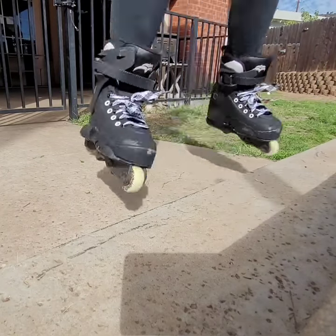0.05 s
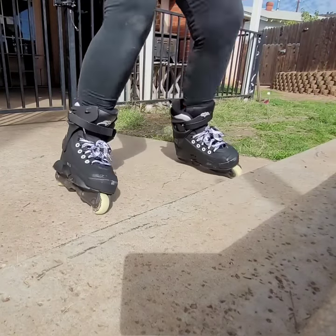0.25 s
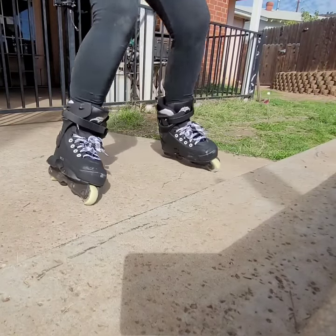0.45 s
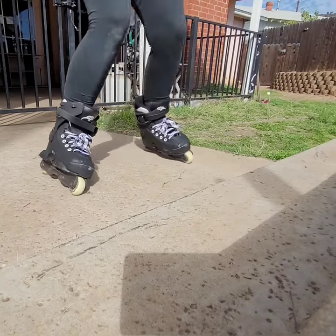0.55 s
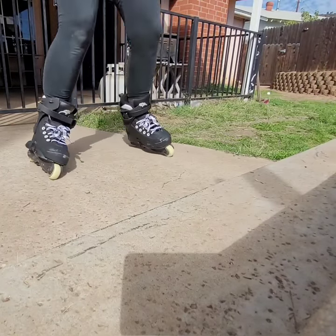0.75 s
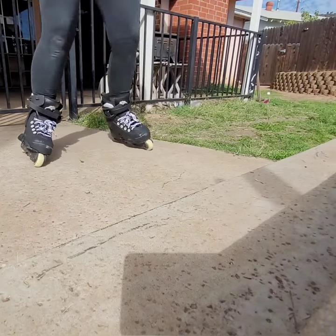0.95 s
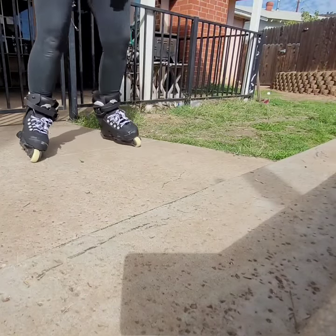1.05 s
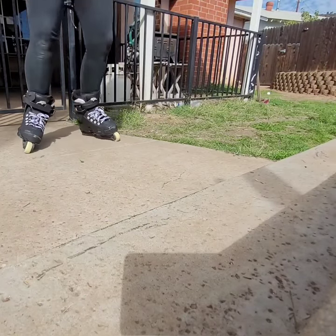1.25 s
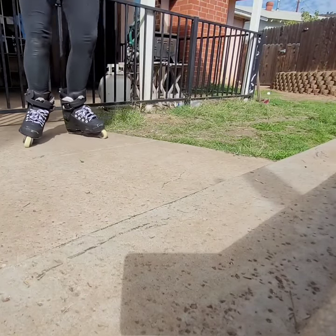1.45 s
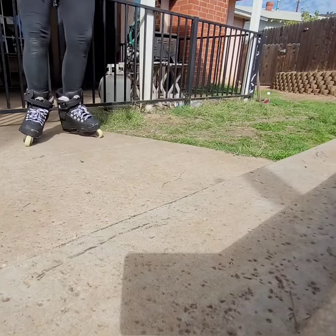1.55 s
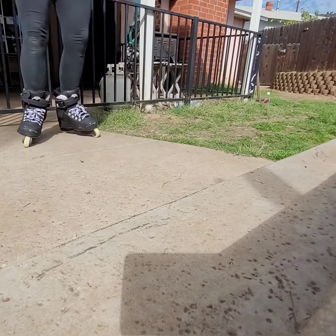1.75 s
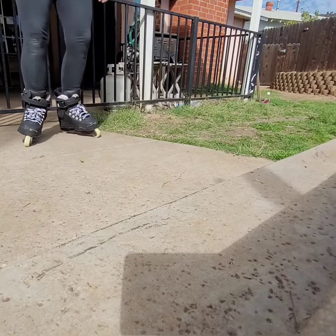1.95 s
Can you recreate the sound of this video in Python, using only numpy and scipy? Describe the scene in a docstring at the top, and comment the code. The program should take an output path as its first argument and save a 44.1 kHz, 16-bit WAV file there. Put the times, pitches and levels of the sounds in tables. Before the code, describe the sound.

Inline skates land with a sharp clack on concrete, then roll away quietly.

```python
"""A concrete patio between house wall and fence, a stereo microphone near the skater.
Inline skates come down from a hop, one boot just after the other: boots thud, frames clack, buckles tick.
The wheels rumble off to the left over grit and scuff once more as the skater turns.
Wall and fence throw the blows back; a machine hums in the yard, swelling briefly around the landing."""
import sys
import numpy as np
from scipy import signal
from scipy.io import wavfile
from scipy.ndimage import map_coordinates

SR = 44100
rng = np.random.default_rng(int(sys.argv[2]) if len(sys.argv) > 2 else 0)


def transcribe(signal):
    """Save signal, clipped to [-1, 1], as a 16-bit WAV file at the path in sys.argv[1]."""
    frames = np.atleast_2d(signal).T
    limited = np.clip(frames, -1, 1)
    pcm = np.round(limited * 32767).astype(np.int16)
    wavfile.write(sys.argv[1], SR, pcm)


N = 88200
TIME = np.arange(N) / SR


# Wheels hitting the slab. Each row: start in seconds, thud in dB, contact time in seconds,
# clack in dB, relative crack level in dB, the crack's left minus right in dB.
TOUCHDOWNS = [(0.2462, -11.5, 0.0018, -25.5, -33.5, 1), (0.2479, -23, .001, -20.5, -19.5, 14),
              (0.2548, -17.5, 0.00045, -8.5, -21, -4), (0.2789, -33.5, .001, -18, -12.5, 16.5),
              (0.2818, -9, 0.00049, -5.5, -24, -4), (0.2875, -24.5, 0.00067, -25, -54, 3),
              (0.2968, -21, .001, -44, -26.5, 0), (0.3008, -24, 0.0012, -38.5, -29.5, -1.5)]
# Hard plastic cracking. Each row: frequency in Hz, relative density in dB.
CRACK_SPECTRUM = [(300, 13.5), (1000, 6), (2500, 1), (5000, -9.5), (7000, -10), (10000, 3), (12500, -3.5),
                  (15000, -16.5)]

def landing():
    """Near the microphone the wheels push into the boots, the frames clack and hard plastic cracks."""
    starts, thud_db, contacts, clack_db, crack_db, pan_db = np.transpose(TOUCHDOWNS)
    thuds = boot(starts, thud_db, contacts)
    clacks = frame(starts, clack_db, clatter_s=0.0071, clatter_db=-5)
    cracks = np.array([bursts(starts, crack_db + side * pan_db / 2, decay_s=0.0022) for side in (1, -1)])
    return thuds + clacks + cracks * coloured(0.65, CRACK_SPECTRUM)


# The boot shell's modes. Each row: frequency in Hz, gain in dB, seconds to fall 60 dB.
BOOT_MODES = [(83.3, -14.5, .3), (169, -5.5, 0.076), (229.3, -21.5, 0.104), (256.4, -2, 0.082),
              (310.8, -11, 0.12), (381.5, -1, 0.056), (428, -9.5, .07), (528.5, -7, .08), (603, -9.5, 0.08),
              (701, -14.5, 0.073)]

def boot(starts, levels_db, contacts):
    """Half-sine pushes set the boot shell thudding."""
    force = np.zeros(N)
    for start, db, length in zip(starts, levels_db, contacts):
        push = np.sin(np.pi * np.clip((TIME - start) / length, 0, 1))
        force += from_db(db) * push / push.sum()
    thud = -sum(ring(force, hz, t60) * from_db(db) for hz, db, t60 in BOOT_MODES)
    return butter(thud, 85, "high")


# The wheel frame's modes. Each row: frequency in Hz, gain in dB, seconds to fall 60 dB.
FRAME_MODES = [(740, 3.5, 0.0083), (902, -7.5, 0.047), (1014, 1, 0.018), (1200, -1.5, 0.012),
               (1467, -10, 0.03), (1703, -3.5, 0.017), (1960, -6, 0.013), (2392, -5, 0.021),
               (2800, -10.5, .018), (3150, -11.5, 0.013), (3847, -7.5, .02), (4060, -7, 0.009),
               (4750, -9.5, 0.013), (5120, -14.5, 0.024), (5650, -15, .012)]
# Its loose parts. Each row: frequency in Hz, relative density in dB.
CLATTER_SPECTRUM = [(100, -11), (300, 11), (700, 4.5), (1200, 4), (2400, -8), (5000, -13.5), (8000, -14.5),
                    (15000, -30)]

def frame(starts, levels_db, clatter_s, clatter_db, uneven_db=2.5):
    """Each knock rings the frame, differently towards each side, and shakes its loose parts."""
    ringing = np.zeros((2, N))
    for k, (hz, db, t60) in enumerate(FRAME_MODES):
        for side in range(2):
            lag, uneven = rng.standard_normal((len(starts), 2)).T
            onsets = ((starts + .0004 * abs(lag)) * SR).astype(int)
            clicks = np.zeros(N)
            clicks[onsets] = from_db(levels_db + db + uneven_db * uneven)
            ringing[side] += (-1) ** k * ring(clicks, hz, t60)
    clatter = coloured(bursts(starts, levels_db, clatter_s), CLATTER_SPECTRUM)
    return from_db(-3) * ringing + from_db(clatter_db) * clatter


# Loose frames, axles and buckles. Each row: start in seconds, tick in dB, frame knock in dB.
LOOSE_PARTS = [(0.0176, -30.5, -46), (0.02, -29, -34.5), (0.072, -48, -41.5), (.104, -43, -47),
               (.164, -35.5, -68), (.219, -37.5, -58), (0.2316, -31, -57), (0.4229, -35, -53),
               (.436, -31, -52), (.468, -32, -33.5), (0.6039, -37, -29.5), (0.656, -44, -74),
               (0.7446, -52, -46.5), (0.8131, -42.5, -47), (.919, -49.5, -47), (1.1039, -69, -50),
               (1.191, -67, -47), (1.233, -56, -48.5), (1.261, -57, -62), (1.2812, -63, -54),
               (1.3185, -60, -41), (1.349, -64, -49), (1.409, -50, -53), (1.439, -50, -62),
               (1.462, -51.5, -60), (1.612, -58, -77), (1.683, -53, -57), (1.7433, -27.5, -30.5),
               (1.7726, -31, -33.5), (1.782, -47, -33.5), (1.8035, -44, -34.5), (1.8175, -43, -36.5)]
# The bright tick. Each row: frequency in Hz, relative density in dB.
TICK_SPECTRUM = [(300, 3), (1000, 0), (3000, 4.5), (6000, 4.5), (9000, -4), (15000, -3)]

def ticks():
    """Small parts click as the weight shifts."""
    starts, tick_db, knock_db = np.transpose(LOOSE_PARTS)
    clicks = coloured(bursts(starts, tick_db, decay_s=0.0015), TICK_SPECTRUM)
    return clicks + frame(starts, knock_db, clatter_s=0.0021, clatter_db=-1.5)


# The roll across the patio. Each row: time in seconds, rumble in dB, drone in dB, grit in dB.
ROLL_LEVELS = [(0, -39.5, -39, -34), (0.058, -61, -53.5, -52.5), (.11, -51, -56.5, -61),
               (.24, -50, -53.5, -42), (.30, -31, -32, -25.5), (.35, -39, -33.5, -49), (.41, -40, -46, -41),
               (.515, -49, -49.5, -50.5), (0.564, -41.5, -43, -46.5), (.61, -50.5, -60, -56),
               (.64, -56, -57, -55.5), (.73, -50, -54.5, -60.5), (0.821, -53.5, -51, -52.5),
               (.93, -53, -50.5, -59), (1.12, -52, -59.5, -62.5), (1.188, -50, -47.5, -50.5),
               (1.36, -54, -53.5, -52.5), (1.50, -60, -51, -56), (1.59, -60, -63.5, -67),
               (1.639, -58, -57, -61.5), (1.73, -58, -56, -67), (1.83, -51.5, -48, -49),
               (1.90, -55.5, -52.5, -54.5), (1.96, -55.5, -62.5, -65.5), (2, -57.5, -56.5, -77.5)]
# Slab, wheels and grit. Each row: frequency in Hz, relative density in dB.
RUMBLE_SPECTRUM = [(30, -25.5), (55, -7.5), (82, 5), (130, -2), (200, -8.5), (400, -24.5), (1500, -60)]
DRONE_SPECTRUM = [(60, -29), (170, -19), (260, -1), (380, 2), (520, -5.5), (800, -14.5), (1500, -24),
                  (5000, -51)]
GRIT_SPECTRUM = [(200, -9), (550, 0.5), (950, 3), (1500, -1), (2300, -3.5), (3200, -8.5), (4800, -14.5),
                 (7000, -20.5), (10000, -26), (14000, -19.5)]

def rolling():
    """On rough concrete the slab rumbles, the wheels drone and grit crunches."""
    times, *levels = np.transpose(ROLL_LEVELS)
    rumble, drone, grit = [from_db(np.interp(TIME, times, db)) for db in levels]
    body = coloured(rumble, RUMBLE_SPECTRUM) + coloured(drone, DRONE_SPECTRUM)
    return body + coloured(grit * grainy(per_s=500, grain_db=2.5, spread_db=2.5), GRIT_SPECTRUM)


# Wheels dragged sideways. Each row: start, attack, hold and release in seconds, level in dB.
DRAGS = [(0, 0.0056, 0.0078, 0.025, -33), (0.4, 0.022, 0.053, 0.014, -44.5),
         (1.7375, 0.0024, 0.084, .02, -42.5)]
# A drag and a skim. Each row: frequency in Hz, relative density in dB.
DRAG_SPECTRUM = [(150, -0.5), (400, 7.5), (900, -18), (1400, -1.5), (2600, 5.5), (4000, -7.5), (7000, -9),
                 (10000, -9), (14000, -14.5)]
SKIM_SPECTRUM = [(300, -9.5), (1000, -2), (1750, 10), (2500, 3), (3300, -0.5), (4500, -18.5), (7000, -30),
                 (14000, -27.5)]

def scuffs():
    """Wheels slide across the grit, and one skims the slab just before the landing."""
    drag = sum(from_db(db) * stroke(*shape) for *shape, db in DRAGS)
    skim = from_db(-41.5) * stroke(start=.119, attack=0.0038, hold=0.044, release=.08)
    return coloured(drag * grainy(), DRAG_SPECTRUM) + coloured(skim * grainy(), SKIM_SPECTRUM)


# Joints and pits in the slab. Each row: start in seconds, level in dB.
SLAB_JOINTS = [(.494, -40), (0.559, -46), (0.573, -48), (0.605, -40.5), (.612, -54), (.921, -45),
               (1.19, -45.5), (1.231, -45), (1.28, -52), (1.833, -45)]

def bumps(contact_s=0.0016):
    """The uneven slab knocks softly up into the boots."""
    starts, levels_db = np.transpose(SLAB_JOINTS)
    return boot(starts, levels_db, np.full(len(starts), contact_s))


# Wheels biting in the turn. Each row: start, attack, hold and release in seconds,
# centre in Hz, width in Hz, level in dB.
WHEEL_BITES = [(1.122, 0.019, 0.26, 0.031, 380, 83.33, -52), (1.224, 0.12, 0.049, 0.011, 2080, 255, -54)]

def carving():
    """Side load on the wheels brings out a low growl and a narrow rasp."""
    out = 0
    for *shape, hz, width, db in WHEEL_BITES:
        mid, side = resonance(rng.standard_normal((2, N)) * grainy(), hz, width)
        out += from_db(db) * stroke(*shape) * stereo(mid, side, hz)
    return out


# Sand along the way. Each row: time in seconds, level in dB.
SAND_LEVELS = [(0, -41), (.1, -69), (.4, -65), (.62, -57.5), (.72, -67), (.83, -63.5), (1.0, -64.5),
               (1.1, -72), (1.17, -62.5), (1.45, -66.5), (1.59, -74), (1.66, -69), (1.73, -86), (1.87, -85),
               (2, -88)]
# Its hiss. Each row: frequency in Hz, relative density in dB.
SAND_SPECTRUM = [(1000, -26.5), (2500, -3.5), (4500, 4), (7000, -6), (10000, 1), (14000, -5)]

def sand():
    """Fine sand hisses under the wheels."""
    level = from_db(np.interp(TIME, *np.transpose(SAND_LEVELS)))
    return coloured(level * grainy(), SAND_SPECTRUM)


def flutter(below_hz=71, depth_db=2):
    """Wavering gain from the wheels' uneven contact."""
    waver = butter(rng.standard_normal(2 * N), below_hz, "low")[N:]
    return from_db(depth_db * waver / waver.std())


def move_left(x, start_s=0.3, length_s=0.48, lag_s=.00014, treble_db=2.5):
    """As the skater rolls left, the microphone's left side brightens; its right dulls and hears later."""
    away = np.clip((TIME - start_s) / length_s, 0, 1)
    treble_gain = from_db(treble_db * away * [[1], [-1]])
    left, right = x + butter(x, 10000, "high", order=1) * (treble_gain - 1)
    late_right = map_coordinates(right, [(TIME - lag_s * away) * SR], order=5)
    return np.array([left, late_right])


# The patio's echo. Each row: frequency in Hz, relative density in dB.
ECHO_SPECTRUM = [(60, -4), (200, -12), (400, -8), (1000, -5.5), (2500, 0), (6000, 5.5), (14000, 2.5)]
# Its decay. Each row: frequency in Hz, seconds to fall 60 dB.
ECHO_DECAY = [(60, .45), (250, 0.24), (600, 0.3), (2400, 0.31), (6000, 0.19), (14000, 0.17)]

def patio(blows, echo_db=-7):
    """Wall, fence and steps close by scatter the blows back to the microphone."""
    arrival = stroke(start=0.0064, attack=0.0035, hold=2, release=1)
    response = coloured(arrival, ECHO_SPECTRUM, ECHO_DECAY)
    response /= np.sqrt(np.sum(response ** 2) / 2)
    return from_db(echo_db) * signal.fftconvolve(blows.mean(axis=0)[None], response, axes=1)[:, :N]


def hum_swell(hz=120.2):
    """A low machine hum and its octave swell briefly, then fade after the landing."""
    envelope = stroke(start=0.038, attack=.01, hold=.23, release=0.18)
    return envelope * (tone(hz, db=-46.5) + tone(2 * hz, db=-52))


# Open air. Each row: frequency in Hz, relative density in dB.
AIR_SPECTRUM = [(30, 2.5), (80, -6.5), (160, 1), (300, -5.5), (500, -10.5), (1000, -22.5), (3000, -29),
                (8000, -39.5), (15000, -46)]
# The machine's hum. Each row: frequency in Hz, level in dB.
MACHINE_TONES = [(80.7, -67), (118.4, -72.5), (177.6, -64.5), (236.9, -58)]

def yard(air_db=-67.3):
    """Outdoor air all round the microphone, and a machine humming far off."""
    return coloured(from_db(air_db), AIR_SPECTRUM) + sum(tone(hz, db) for hz, db in MACHINE_TONES)


# How alike the microphone's two sides are. Each row: frequency in Hz, correlation from -1 to 1.
MIC_CORRELATION = [(30, 0.48), (120, .93), (300, 0.85), (600, 0.42), (1100, 0.11), (2200, 0.18),
                   (4000, -0.11), (14000, 0.34)]

def stereo(mid, side, hz):
    """Blend two noises into left and right, as alike as they reach the microphone at this pitch."""
    alike = at_hz(MIC_CORRELATION, hz)
    return np.sqrt((1 + alike) / 2) * mid + np.sqrt((1 - alike) / 2) * side * [[1], [-1]]


def coloured(envelope, spectrum, t60s=None):
    """Stereo noise in half-octave bands, which may each die away; otherwise rms 1 at envelope 1."""
    edges = 28 * 2 ** np.arange(0, 9.6, .5)
    white = rng.standard_normal((2, 2, N)) * envelope + 1e-18
    out, power = 0, 0
    for k, (low, high) in enumerate(zip(edges, edges[1:])):
        mid, side = butter(white[k % 2], [low, high], "band")
        hz = np.sqrt(low * high)
        gain = from_db(at_hz(spectrum, hz))
        power += gain ** 2 * (high - low) / (SR / 2)
        if t60s:
            gain = gain * np.exp(-np.log(1000) * TIME / at_hz(t60s, hz))
        out += gain * stereo(mid, side, hz)
    return out / np.sqrt(power)


def grainy(per_s=1500, grain_db=4, spread_db=0.5):
    """Envelope of rough concrete: a smooth bed with grains of uneven size; rms 1."""
    sizes = from_db(grain_db + spread_db * np.minimum(rng.exponential(1, N), 3))
    struck = rng.random(N) < per_s / SR
    power = 1 + signal.lfilter([1], [1, -.9], sizes ** 2 * struck)
    return np.sqrt(power / power.mean())


def stroke(start, attack, hold, release):
    """Straight rise, hold, then a fall with time constant `release`; all in seconds."""
    t = TIME - start
    return np.clip(t / attack, 0, 1) * np.exp(-np.clip((t - attack - hold) / release, 0, 40))


def bursts(starts, levels_db, decay_s):
    """Envelope of sudden bursts that die away."""
    return sum(from_db(db) * stroke(s, .0003, 0.00021, decay_s) for s, db in zip(starts, levels_db))


def ring(force, hz, t60):
    """A unit click sets a sine of height 1 ringing."""
    r, w = np.exp(-np.log(1000) / (t60 * SR)), 2 * np.pi * hz / SR
    return signal.lfilter([0, np.sin(w)], [1, -2 * r * np.cos(w), r * r], force + 1e-18)


def resonance(x, hz, width):
    """A two-pole band; white noise keeps its power."""
    r, w = np.exp(-np.pi * width / SR), 2 * np.pi * hz / SR
    return np.sqrt((1 - r * r) / 2) * signal.lfilter([1, 0, -1], [1, -2 * r * np.cos(w), r * r], x)


def tone(hz, db):
    """A sine of the given rms level."""
    return np.sqrt(2) * from_db(db) * np.sin(2 * np.pi * (hz * TIME + rng.random()))


def butter(x, hz, kind, order=2):
    """A gentle low, high or band pass."""
    return signal.sosfilt(signal.butter(order, hz, kind, fs=SR, output="sos"), x)


def at_hz(points, hz):
    """Read a table on a log-frequency axis."""
    frequencies, values = np.transpose(points)
    return np.interp(np.log(hz), np.log(frequencies), values)


def from_db(db):
    """Decibels to gain."""
    return 10 ** (np.asarray(db) / 20)


def scene():
    """Skates in front and moving left, the echoes of their blows around them, the yard behind."""
    blows = landing() + ticks() + bumps()
    wheels = (rolling() + carving() + sand()) * flutter()
    return move_left(blows + wheels + scuffs() + hum_swell()) + patio(blows) + yard()


def record(dry):
    """The microphone loses the deepest bass; the recorder rounds the peaks and cuts the top."""
    thinned = butter(dry, 35, "high")
    rounded = thinned / (1 + (thinned / .72) ** 4) ** .25
    return signal.sosfilt(signal.ellip(8, .3, 80, 14450, fs=SR, output="sos"), rounded)


dry = scene()
out = record(dry)
transcribe(out)
```